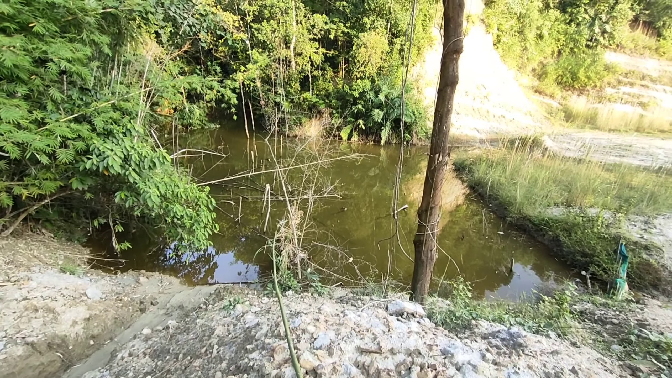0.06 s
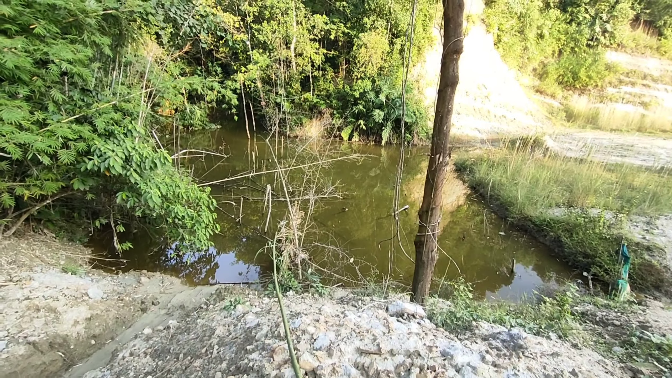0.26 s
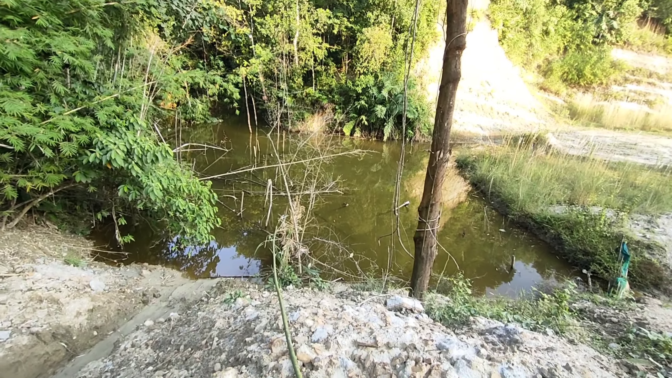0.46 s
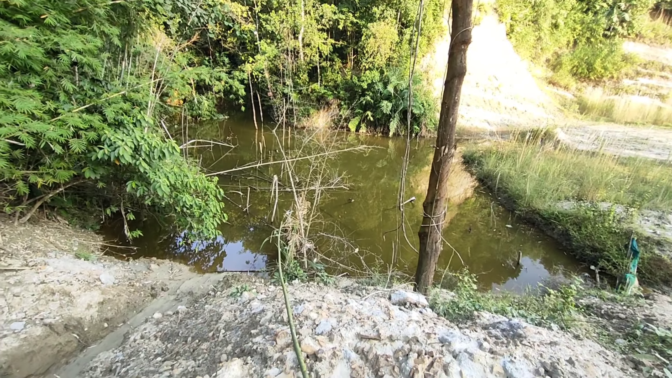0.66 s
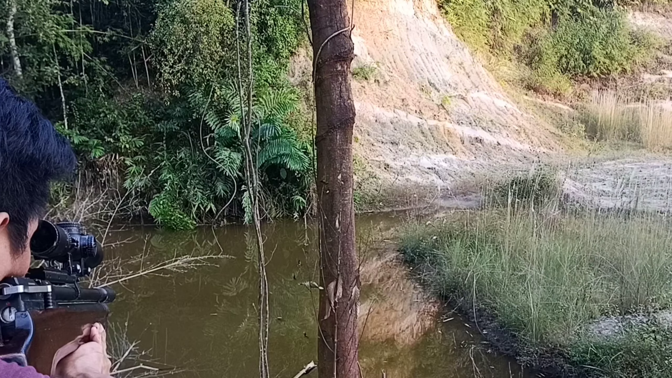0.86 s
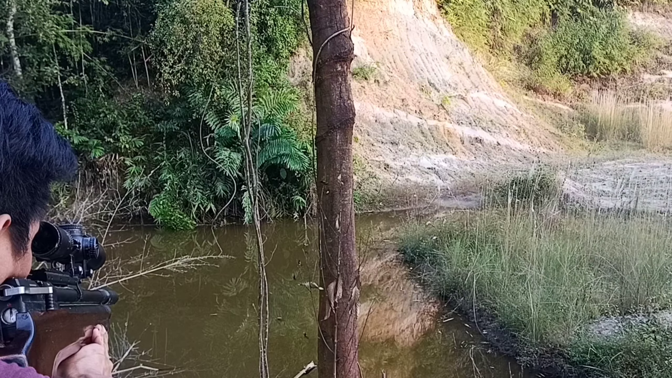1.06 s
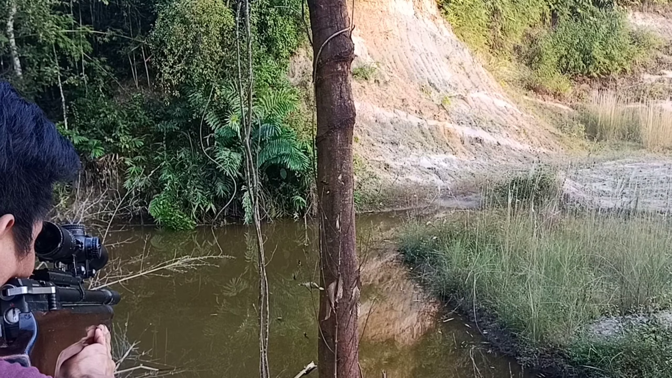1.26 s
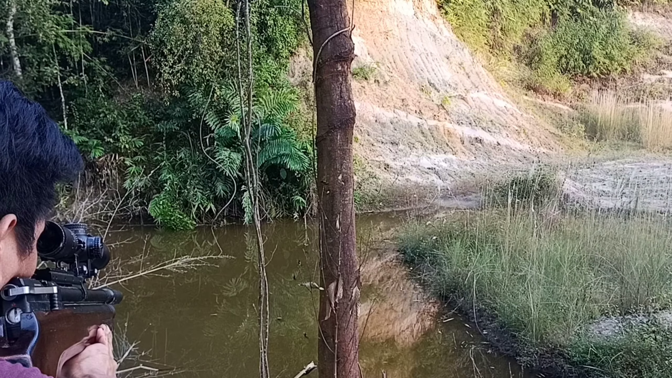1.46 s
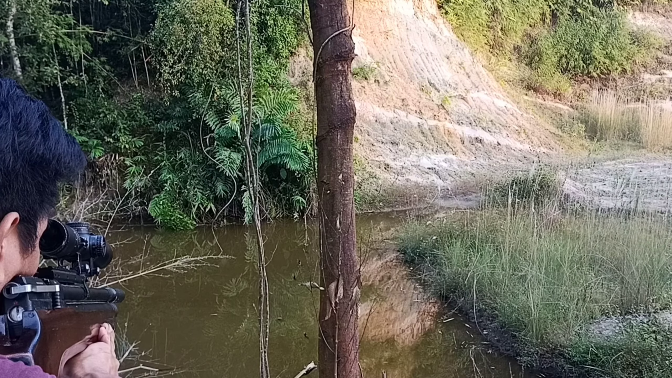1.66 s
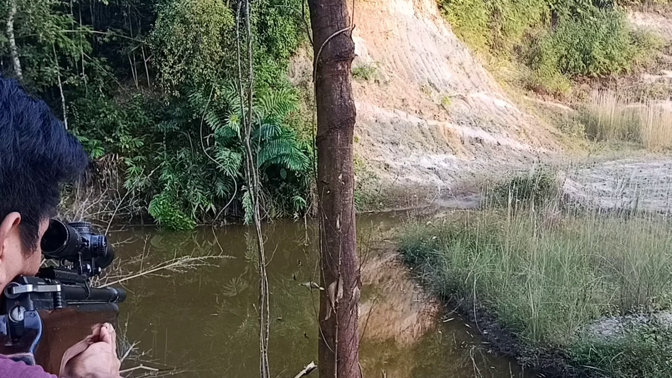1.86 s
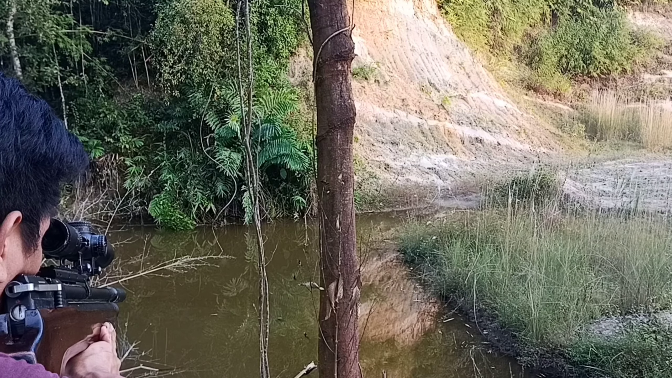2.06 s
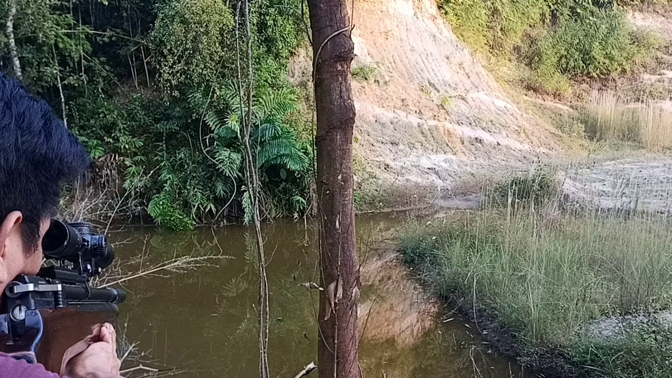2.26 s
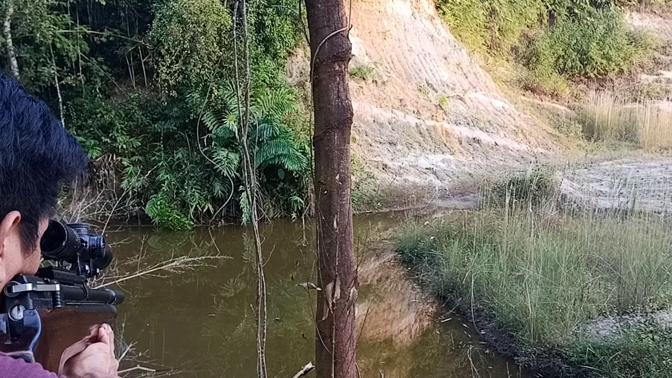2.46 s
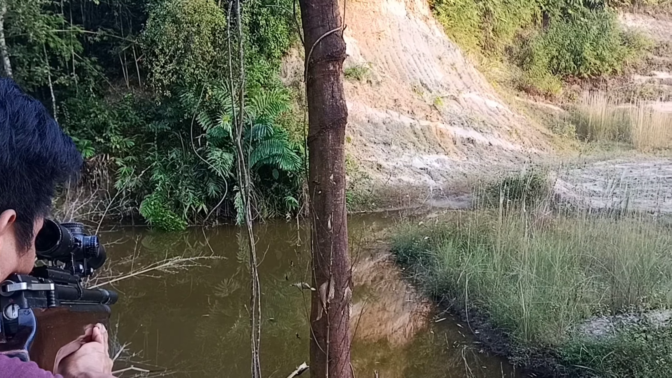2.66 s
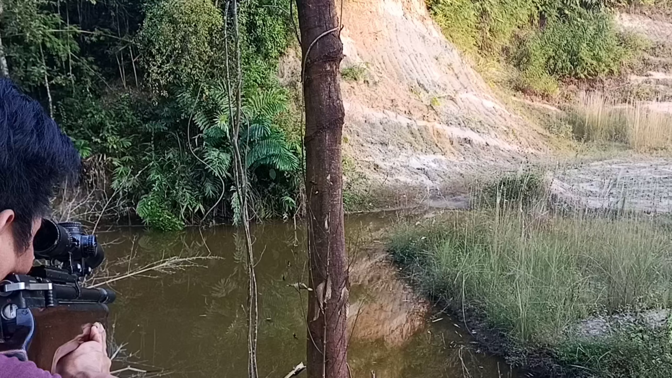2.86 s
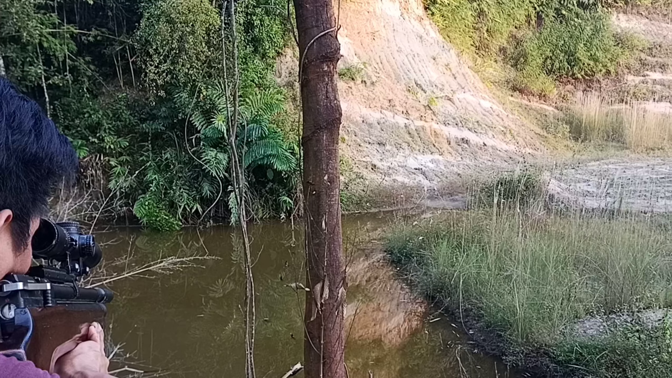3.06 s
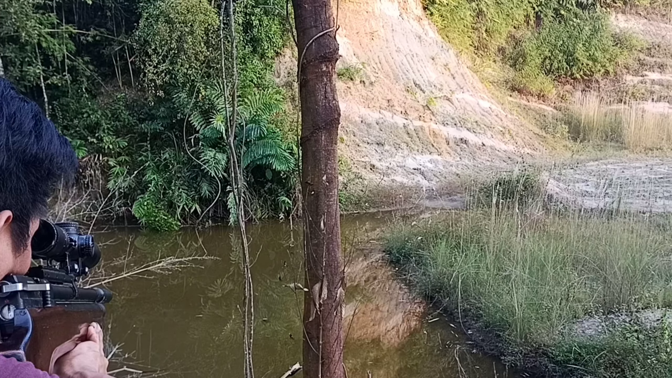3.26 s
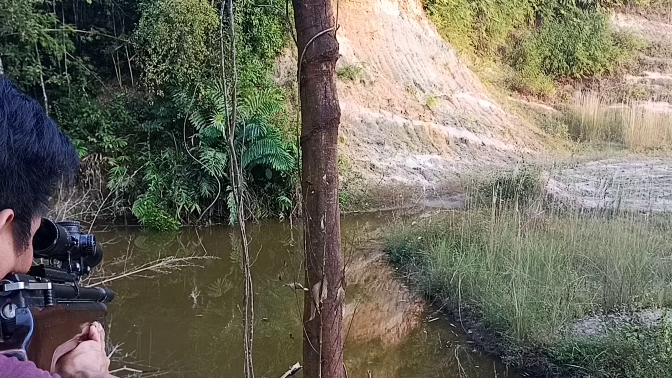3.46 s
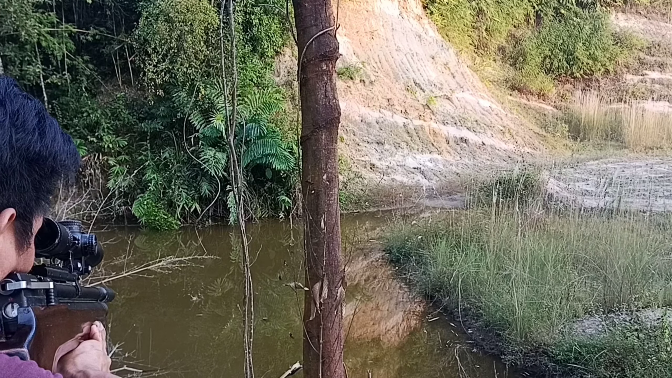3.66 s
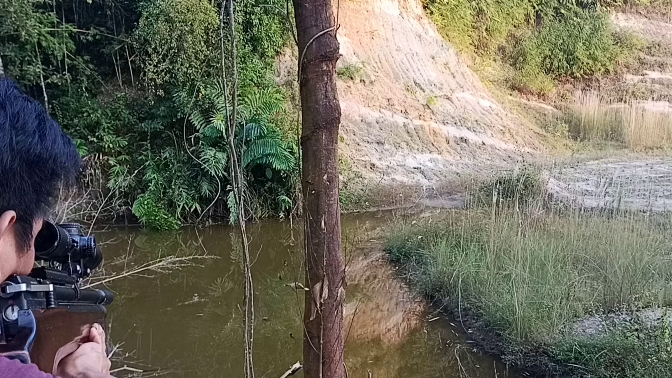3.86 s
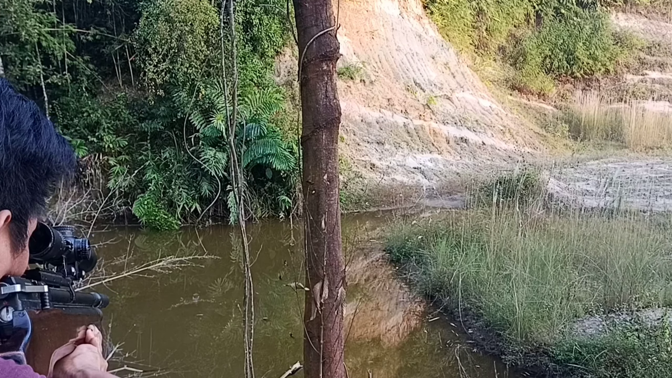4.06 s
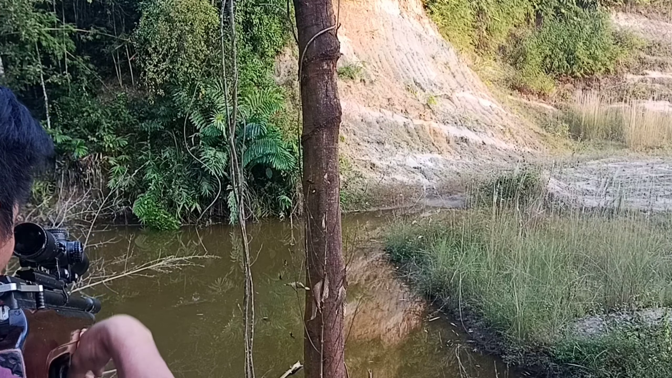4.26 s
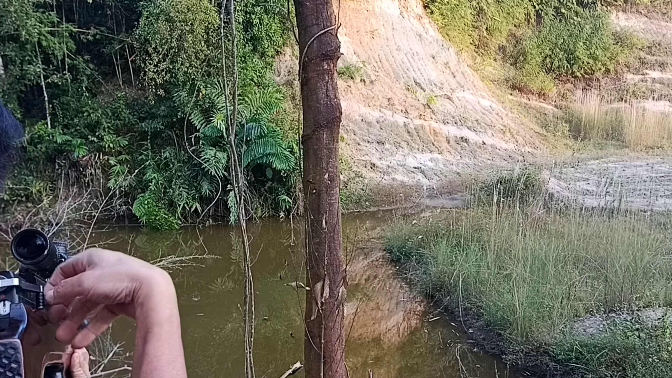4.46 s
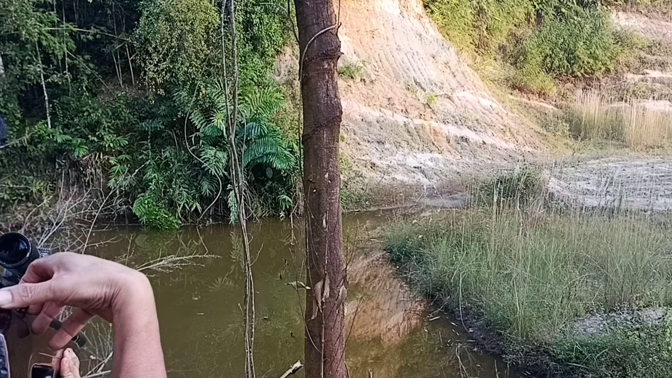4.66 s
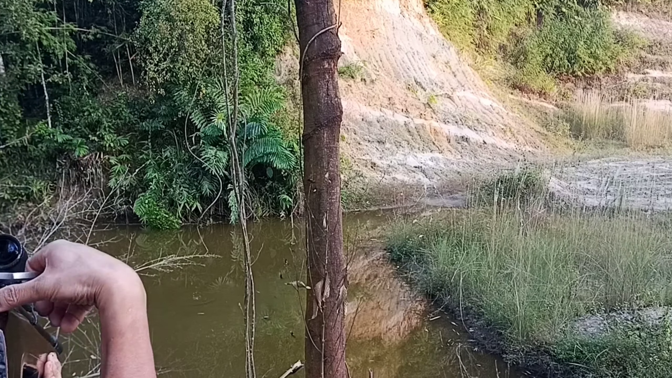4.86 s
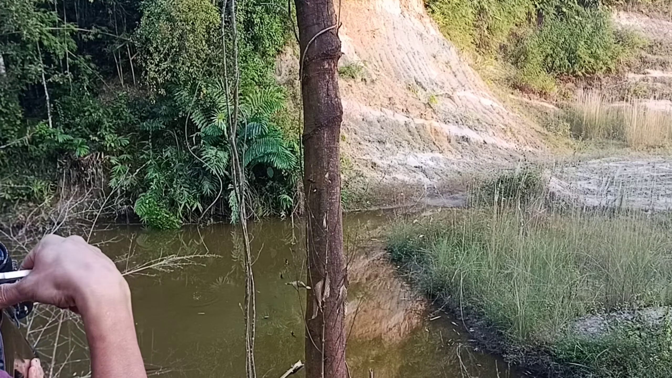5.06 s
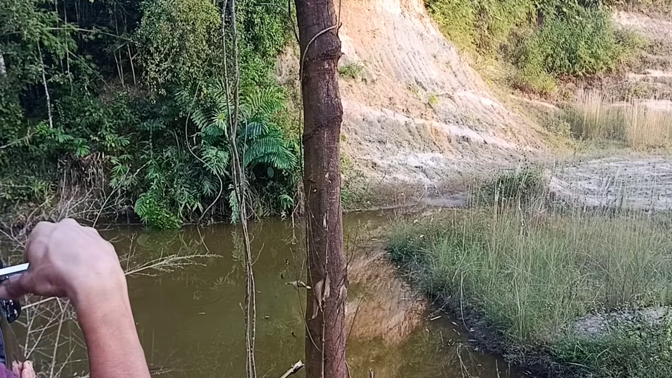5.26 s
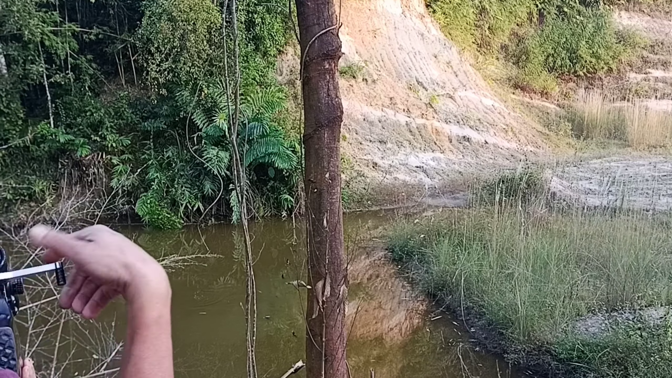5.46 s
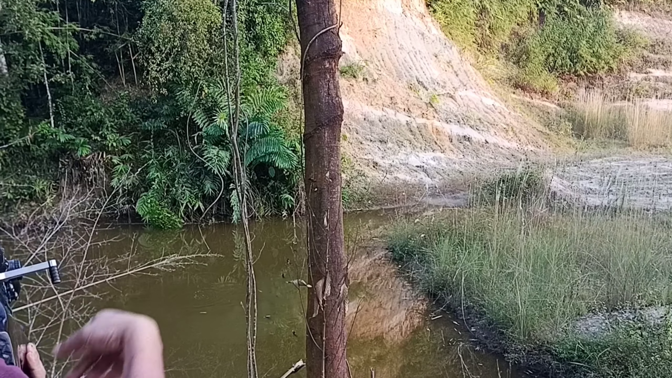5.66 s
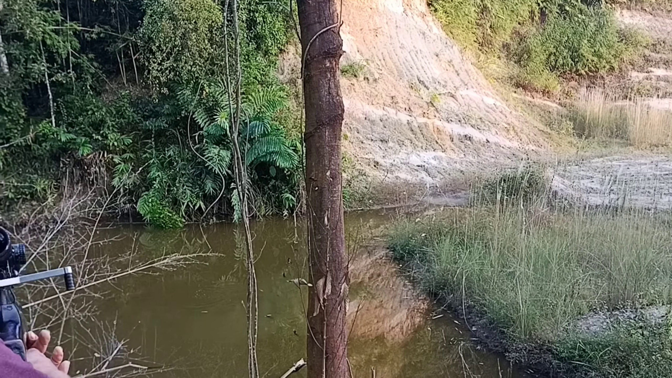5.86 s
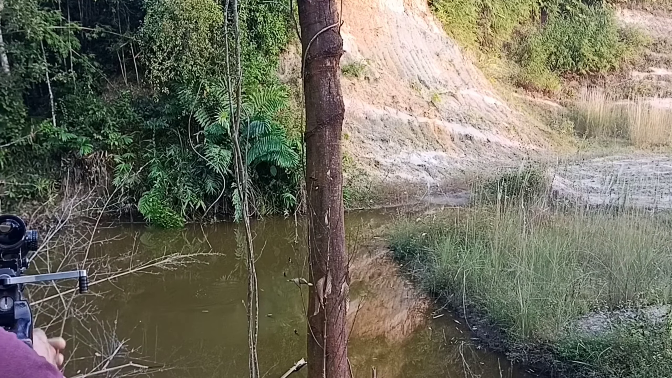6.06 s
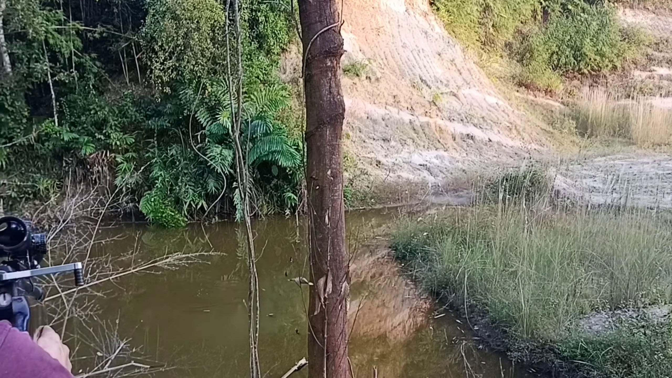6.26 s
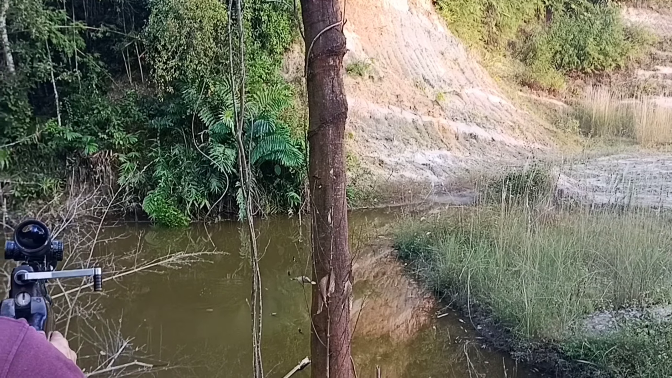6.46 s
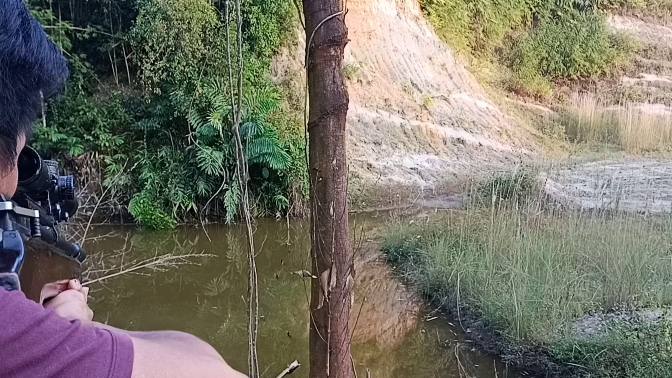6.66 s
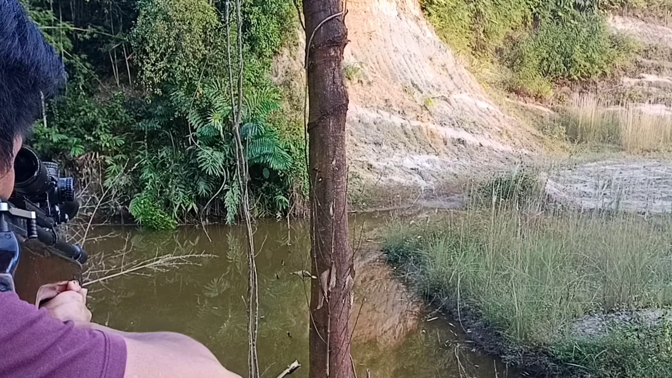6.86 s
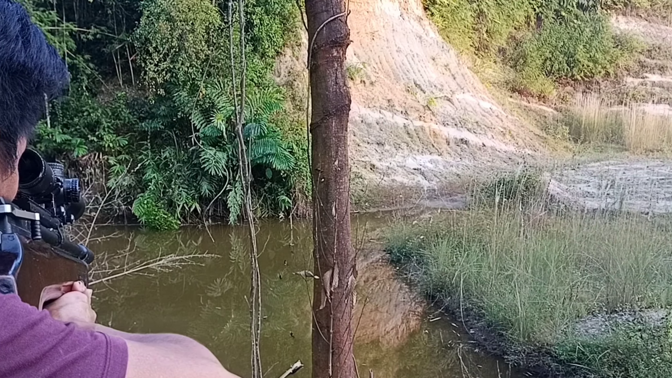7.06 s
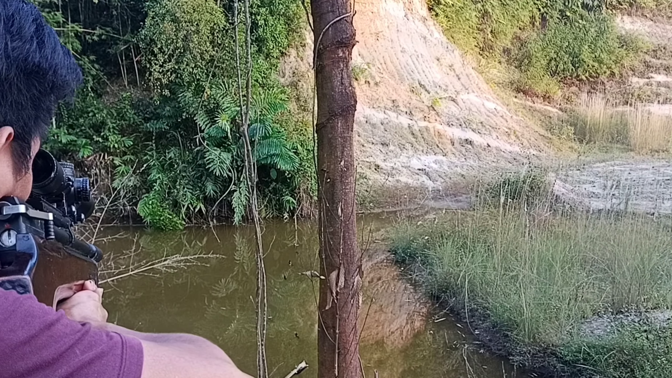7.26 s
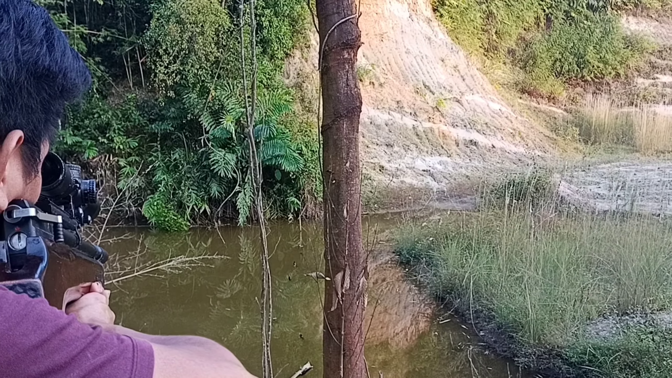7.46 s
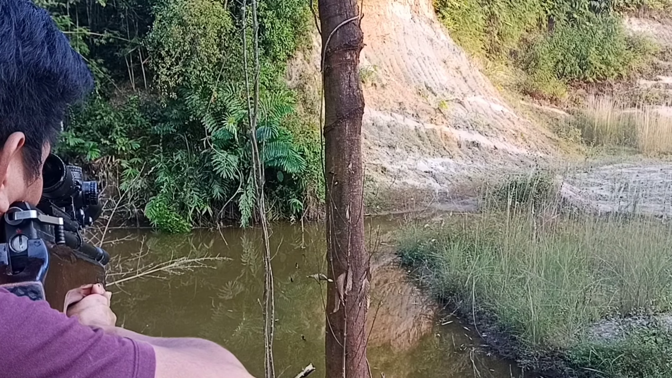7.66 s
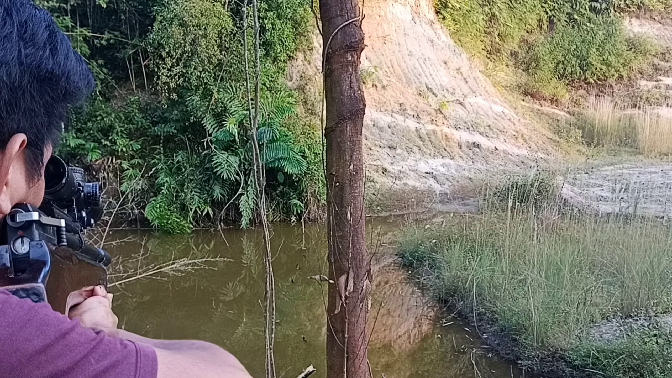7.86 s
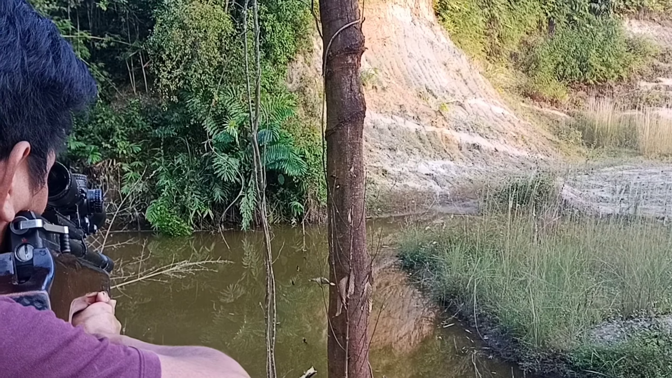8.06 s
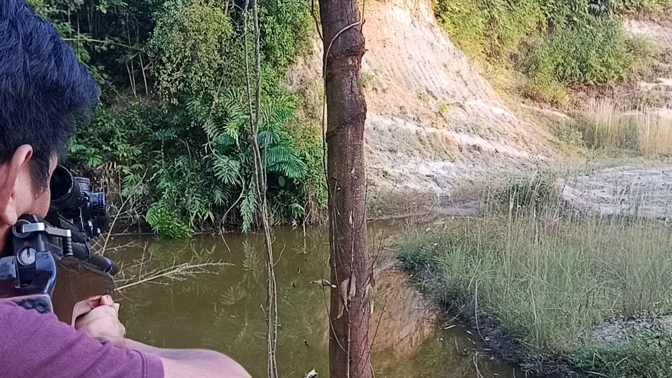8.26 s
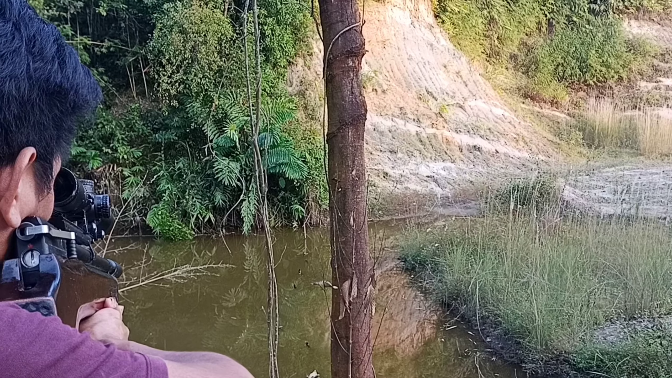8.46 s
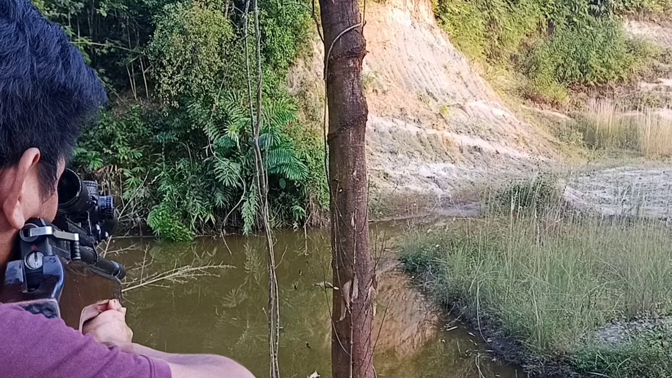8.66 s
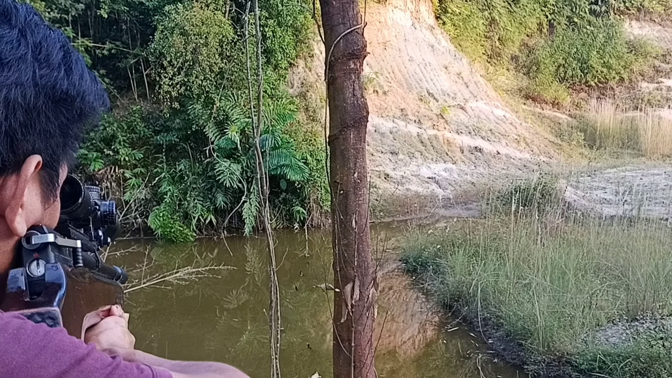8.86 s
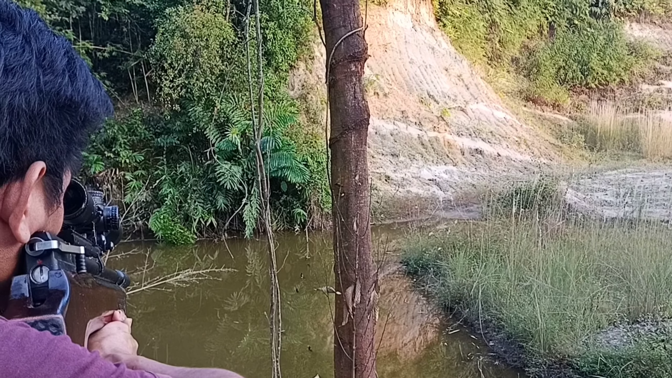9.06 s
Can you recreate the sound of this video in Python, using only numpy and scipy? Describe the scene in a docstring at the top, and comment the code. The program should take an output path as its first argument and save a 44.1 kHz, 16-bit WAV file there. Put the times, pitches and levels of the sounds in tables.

```python
"""Gravel scuffs by a pond; after a short silence, a steady insect chorus sets in, with far knocks.
At about 3.4 s an air rifle fires: its valve lets out a short blast of air, the slug smacks into
the water and a clay bank throws the noise back. The rifle is cocked with a run of metal clicks.
At about 8.3 s a second, duller shot thuds, with a few faint plops before and after it."""
import sys
import numpy as np
from scipy import signal
from scipy.fft import rfft, irfft
from scipy.io import wavfile
from scipy.ndimage import uniform_filter1d

SR = 44100
rng = np.random.default_rng(int(sys.argv[2]) if len(sys.argv) > 2 else 0)


def inscribe(sig):
    """Save sig as 16-bit PCM at rate SR to the path in sys.argv[1].

    A 1-D sig is mono; a 2-D sig holds one channel per row.
    Samples are clipped to [-1, 1] before scaling.
    """
    pcm = np.round(np.clip(np.atleast_2d(sig).T, -1, 1) * 32767)
    wavfile.write(sys.argv[1], SR, pcm.astype(np.int16))


N = 401310
TIME = np.arange(N) / SR
FREQS = np.maximum(np.fft.rfftfreq(N, 1 / SR), 1)

# A "colour" says how strong a noise is from low to high; a fade time (t60) is a drop of 60 dB.
# colours of the air blast, its echoes and the firing thump: (frequency [Hz], relative level [dB])
BLAST_COLOUR = [(880, -49), (1500, -21), (2170, -31), (2890, -14.5), (3510, -20), (3690, -12), (4350, -2),
                (4940, 0), (6070, 3), (6690, -12), (7750, 1), (11400, -5.5), (12100, -3.5), (14200, -2.5),
                (15500, -11)]
ECHO_COLOUR = [(880, -37), (1500, -6.5), (1970, -10), (2540, -8.5), (3690, -5), (4480, -2), (6070, 1),
               (7230, 4.5), (10800, -5.5), (15500, -2.5)]
THUMP_COLOUR = [(90, -13), (170, 1), (320, -10), (480, 2.5), (750, -10), (1000, -2.5), (1500, -6),
                (2500, -15)]
# ringing notes of the tube around the muzzle: (pitch [Hz], relative level [dB])
MUZZLE_NOTES = [(4458, -10.5), (4594, -21), (4784, -24), (4966, -16), (5085, -13), (5505, -14), (5676, -21),
                (5990, -23), (7569, -22), (7917, -23), (8138, -28), (9123, -29), (10093, -26), (11135, -20),
                (14227, -15), (14637, -17), (15160, -16), (15243, -8)]
# echoes from near trees, the bank and the woods: (delay [s], level [dB], rise [s], fade time [s])
ECHOES = [(.012, -32, .004, 0.27), (.042, -34.5, .008, 1.5), (0.149, -22.5, 0.013, 0.44),
          (.24, -34.5, .05, 1.05)]
SHOT_S, VALVE_OPEN_S, VALVE_RISE_S = 3.4422, .0205, .0008

# smacks and faint plops on the water:
# (time [s], crack [dB], air pocket [dB], pocket's first pitch [Hz], slap [dB], echo [dB])
SMACKS = [(3.5521, -14.5, -10.5, 130, -19, -37), (7.508, -80, -40, 302, -52, -75),
          (7.925, -80, -42, 355, -49, -64), (8.293, -47.5, -27, 222, -30, -55.5),
          (8.309, -58, -34, 710, -39, -76), (8.338, -70, -36, 307, -54, -76),
          (8.7427, -62, -35.5, 294, -43.5, -53.5)]
# colours of a smack's crack, slap and echo: (frequency [Hz], relative level [dB])
CRACK_COLOUR = [(1000, -26), (2300, -22), (3500, 4), (5000, 5), (7000, -3), (9000, 3.5), (12000, -1.5),
                (15500, -0.5)]
SLAP_COLOUR = [(50, 13), (130, 9.5), (300, -0.5), (500, 2), (800, -9), (1500, -22.5), (2500, -29),
               (5000, -39)]
BANK_COLOUR = [(50, -53), (100, -3), (155, -5), (230, -6.5), (500, -6), (1100, -15), (2000, -18.5),
               (3500, -21.5), (7000, -43)]

# faint opening ticks, the rifle's metal clicks and one last far knock at 6.59 s:
# (time [s], snap [dB], relative ring level [dB], ring pitch [Hz])
CLICKS = [(.155, -70, -54, 2100), (.542, -68, -52, 1980), (1.115, -52, -44, 2420),
          (1.334, -56, -46.5, 3200), (3.4355, -34, -28, 800), (4.211, -35.5, -47, 3000),
          (4.565, -37, -42.5, 1590), (4.8415, -25.5, -37, 1460), (4.956, -35.5, -42.5, 1910),
          (5.012, -34.5, -36, 1380), (5.245, -32, -70, 3500), (5.2522, -11, -23, 1220),
          (5.3103, -24.5, -19, 1910), (5.395, -44, -31.5, 4200), (5.411, -31.5, -31, 1380),
          (5.436, -38, -42, 1340), (5.479, -40, -41.5, 1290), (5.585, -46, -30, 3070),
          (5.626, -44, -35.5, 3350), (5.671, -44, -39, 2980), (6.248, -39, -35.5, 2530),
          (6.591, -49, -41.5, 710)]
# fingers ticking on the rifle:
# (start [s], end [s], rate [1/s], snap [dB], relative ring level [dB], ring pitch [Hz])
FINGER_TICKS = [(4.52, 5.2, 12.5, -49, -47.5, 1500), (5.329, 5.53, 22, -46, -48, 1500),
                (6.28, 6.55, 9.8, -58, -46.5, 1900)]
# ringing notes of the rifle, used for every click: (pitch [Hz], relative level [dB], fade time [s])
RING_NOTES = [(295, 7.5, 0.044), (550, 5.5, 0.031), (707, 3.5, 0.023), (827, -4.5, 0.045),
              (1050, -11, 0.068), (1175, -1, 0.044), (1448, -4.5, 0.06), (1716, 1.5, 0.015),
              (2100, -4.5, 0.037), (2470, 2.5, 0.013), (2690, -6.5, 0.036), (2960, 3, 0.019),
              (3500, 4, 0.017), (4000, 13.5, 0.01)]
# squeaks of the cocking lever: (time [s], length [s], level [dB], first pitch [Hz], last pitch [Hz])
SQUEAKS = [(5.3132, 0.0041, -20, 2940, 2100), (5.358, 0.029, -52, 2400, 1850),
           (5.383, 0.0065, -35.5, 2250, 1660)]
# the rifle bumping the shoulder: (time [s], length [s], level [dB])
BUMPS = [(6.2, 0.11, -53), (6.46, 0.175, -54.5)]
# scuffs on gravel: (time [s], level [dB])
SCUFFS = [(0, -42.5), (.016, -51), (.062, -58.5), (.082, -59)]
# colours of a snap, a bump and a scuff: (frequency [Hz], relative level [dB])
SNAP_COLOUR = [(2000, -19), (3300, -14), (4100, -1), (5500, -1), (7000, 4.5), (8600, -6.5), (11000, -5.5),
               (12700, -13), (15500, -4.5)]
BUMP_COLOUR = [(25, -12), (60, 4), (110, 4), (200, -6.5), (330, -6), (600, -21), (2000, -42)]
SCUFF_COLOUR = [(150, -19), (260, -7), (500, -10), (880, 1), (1250, -8), (1700, -4), (2500, -7),
                (3600, -13.5), (8000, -21.5), (10000, -21.5)]

# runs of chirps from the nearest cricket: (first chirp [s], last chirp [s], spacing [s])
CRICKET_RUNS = [(.873, 2.956, .04629), (3.083, 3.083, .046), (3.225, 3.406, .0452), (3.774, 3.958, .046),
                (4.082, 4.996, .0457), (5.042, 6.014, .0463), (6.059, 6.566, .0461), (6.611, 9.069, .04638)]
# runs of katydid calls: (first [s], last [s], spacing [s], length [s], level [dB], top pitch [Hz])
KATYDID_RUNS = [(1.331, 2.65, 0.3, .27, -70, 9560), (5.5, 6.36, .285, .25, -63.5, 9400),
                (6.528, 8.08, .221, 0.17, -63, 9240)]
# swells of a buzzing insect: (time [s], length [s], level [dB])
BUZZES = [(1.5, 0.27, -62.5), (2.35, .28, -56.5), (6.15, 0.51, -53.5), (7.74, 0.28, -56.5)]
# notes of a far bird: (time [s], length [s], level [dB], first pitch [Hz], last pitch [Hz])
BIRD_NOTES = [(1.68, 0.1, -69, 662, 697), (1.9, 0.11, -73, 760, 724), (2.14, 0.19, -68, 760, 696),
              (5.675, 0.094, -49, 1055, 1170)]
# steady insects: (pitch [Hz], width [Hz], level against the chorus [dB], start [s], end [s])
SINGERS = [(6220, 38, -15.5, 0.77, 6.61), (8060, 96, -15, 0.8, 4.7), (8010, 64, -11.5, .86, 9.4),
           (8400, 200, -18, .86, 9.2), (4840, 43, -22, 0.79, 9.9), (6770, 52, -11, 6.61, 12),
           (6010, 77, -17, 5.5, 5.4)]
# colours of the insect chorus at the opening, early and late: (frequency [Hz], relative level [dB])
CHORUS_OPENING = [(40, -27), (120, -7.5), (500, -10), (1200, -14), (2000, -11), (3500, -16), (4100, -13.5),
                  (4600, -1.5), (5300, -2), (6000, -16.5), (7100, -19), (8000, -7.5), (9700, -14),
                  (11000, -27), (15300, -16)]
CHORUS_EARLY = [(2000, -38), (3900, -22.5), (4400, -3.5), (5000, 1.5), (5450, -9), (5800, -17), (6300, -6),
                (6800, -4), (7200, -11), (8100, -2.5), (8900, -5.5), (9600, -16.5), (10900, -24),
                (12800, -23.5), (15200, -6)]
CHORUS_LATE = [(2000, -61), (3900, -21.5), (4400, -3), (5050, 0.5), (5700, -16), (6400, -1.5), (6800, -2.5),
               (7100, -10), (8100, -18), (8900, -8), (9600, -21), (10900, -25.5), (13500, -12),
               (15300, -10)]
# loudness of the opening chorus: (time [s], relative level [dB])
OPENING_LEVEL = [(0.0, -70), (0.02, -61), (0.214, -73.5), (0.474, -69), (0.59, -70.5)]
# colours of the far knocks and the moving air: (frequency [Hz], relative level [dB])
KNOCK_COLOUR = [(300, -15), (420, -2), (540, 3), (690, -3), (850, -6), (1000, -2.5), (1150, -2.5),
                (1350, -20), (1560, -4.5), (1800, -15)]
AIR_COLOUR = [(25, -33), (50, -6), (90, 2), (140, 0), (250, -4), (500, -6.5), (800, -12), (1300, -15.5),
              (2500, -16), (3800, -18.5), (7000, -24.5)]
# steady stretches of the background: (start [s], insects [dB], air [dB])
STRETCHES = [(0.859, -54, -63.5), (3.5, -49, -56.5), (6.61, -53.5, -59.5)]
CHORUS_CHANGE_S = 6.61
PAUSE_START_S, PAUSE_END_S, PAUSE_FADE_S = .598, .85, .008


def blast(jet_db=-14, sag_db_per_s=402, shut_db_per_s=2400, leak_s=.0081, leak_db=-31, ring_db=-2):
    """Air leaks, then jets out and rings the muzzle; it weakens as pressure sags and the valve shuts."""
    age = np.maximum(TIME - SHOT_S, 0)
    loss_db = sag_db_per_s * age + shut_db_per_s * np.maximum(age - VALVE_OPEN_S, 0)
    jet = from_db(np.maximum(jet_db - loss_db, -200)) * np.minimum(age / VALVE_RISE_S, 1)
    leak = swells([(SHOT_S - leak_s, leak_s + 2 * VALVE_RISE_S, leak_db)])
    ringing = sum(from_db(db) * np.sqrt(2) * np.sin(2 * np.pi * (hz * TIME + rng.random()))
                  for hz, db in MUZZLE_NOTES)
    return (leak + jet) * (noise(BLAST_COLOUR) + from_db(ring_db) * ringing)


def firing_thump():
    """The hammer and the pushed-out air give a low thump just ahead of the hiss."""
    return decays(times=[3.4378], dbs=[-29], t60=.09, attack=.00037) * noise(THUMP_COLOUR)


def blast_echoes(dull_from_s=3.62, dulling_s=.057, dull_hz=6500):
    """Leaves and clay throw the blast back as a crackling wash, duller the farther it has travelled."""
    bright = noise(ECHO_COLOUR)
    dull = unit_power(irfft(rfft(bright) / np.hypot(1, (FREQS / dull_hz) ** 2), N))
    brightness = np.exp(-np.maximum(TIME - dull_from_s, 0) / dulling_s)
    wash = brightness * bright + (1 - brightness) * dull
    power = sum(decays([SHOT_S + delay], [db], t60, rise) ** 2 for delay, db, rise, t60 in ECHOES)
    return np.sqrt(power) * flicker(db=1, speed_hz=250) * wash


def water_smacks(rise_per_s=9, ring_cycles=11.3, bank_delay_s=.071, bank_db=-12, woods_db=-18, low_hz=92):
    """A crack and a slap; a pocket of air rings, rising as it shrinks, and the bank answers."""
    times, crack_db, _, _, slap_db, echo_db = np.transpose(SMACKS)
    booms, age = np.zeros(N), np.arange(SR // 4) / SR
    for at, _, db, hz, _, _ in SMACKS:
        fade = from_db(db - 60 * age * hz / ring_cycles)
        boom = fade * np.cos(2 * np.pi * hz * age * (1 + rise_per_s * age))
        add(booms, at, boom * (1 - np.exp(-age / .00036)))
        add(booms, at + bank_delay_s, from_db(bank_db) * boom * (1 - np.exp(-age / .002)))
    out = booms + from_db(woods_db) * woods_echo(booms, t60=.65)
    out += decays(times, crack_db, t60=.031, attack=.0001) * noise(CRACK_COLOUR)
    out += decays(times, slap_db, t60=.077, attack=.0001) * noise(SLAP_COLOUR)
    out += decays(times + .0058, echo_db, t60=1.0, attack=.021) * noise(BANK_COLOUR)
    # so small a source gives off little deep bass
    return signal.sosfilt(signal.butter(3, low_hz, "high", fs=SR, output="sos"), out)


def pond_hollow():
    """The boom of the first smack lingers in the hollow of the pond."""
    return decays(times=[3.62], dbs=[-42], t60=.91, attack=.042) * band(hz=145, width_hz=36)


def clicks(spread=.46, ring_lag_s=.0038, ring_lift_db=2.5, stock_hz=520, stock_db=-17.5, echo_db=-17):
    """A snap, then a ring near its own pitch; in the rifle, a part springs free and then lands."""
    rows = list(CLICKS) + finger_ticks()
    times, snap_db, _, _ = np.transpose(rows)
    out = decays(times, snap_db, t60=.022, attack=.000071) * noise(SNAP_COLOUR)
    hz, note_db, t60 = np.transpose(RING_NOTES)[:, :, None]
    age = np.arange(SR // 12) / SR
    fade = from_db(-60 * age / t60) * (1 - np.exp(-age * SR / 16))
    stock = from_db(stock_db) * np.exp(-2 * np.log(hz / stock_hz) ** 2)  # adds some low ring
    for at, _, ring_db, centre_hz in rows:
        nearness = np.exp(-.5 * (np.log(hz / centre_hz) / spread) ** 2)
        weight = from_db(note_db + rng.normal(0, 2, hz.shape)) * (stock + nearness)
        pitch = hz * rng.normal(1, .014, hz.shape)
        notes = np.sin(2 * np.pi * (pitch * age + rng.random(hz.shape)))
        ring = np.sum(weight * fade * notes, axis=0) / np.linalg.norm(weight)
        add(out, at + ring_lag_s, from_db(ring_db + ring_lift_db) * ring)
    return out + from_db(echo_db) * woods_echo(out, t60=.24)


def finger_ticks(uneven_db=3):
    """Fingers tap the rifle unevenly; gives extra rows like those of CLICKS."""
    rows = []
    for start, end, rate, snap_db, ring_db, hz in FINGER_TICKS:
        chance = rng.uniform(-1, 1, size=(40, 3))
        for at, (late, hard, high) in zip(beats(start, end, 1 / rate), chance):
            force_db = uneven_db * hard
            rows.append((at + .5 * late / rate, snap_db + force_db, ring_db + force_db,
                         hz * np.exp(.5 * high)))
    return rows


def lever_squeaks():
    """The cocking lever gives short, falling squeaks."""
    return sliding_tones(SQUEAKS, rasp=.34, rasp_hz=400)


def shoulder_bumps():
    """The rifle shifts against the shoulder with soft, low bumps."""
    return swells(BUMPS) * noise(BUMP_COLOUR)


def sleeve(start_s=4.22, end_s=4.62, ticks_per_s=32, softest_db=-49, range_db=7):
    """Cloth gives tiny bright ticks at random as the hand reaches to cock the rifle."""
    when, size = rng.uniform(0, 1, size=(int((end_s - start_s) * ticks_per_s), 2)).T
    times = start_s + (end_s - start_s) * when
    ticks = decays(times, softest_db + range_db * size, t60=.017, attack=.00055)
    return ticks * band(hz=10000, width_hz=5100)


def gravel_opening(chorus_lift_db=4):
    """Gritty scuffs on gravel die away into a quiet insect chorus."""
    scuffs = decays(*np.transpose(SCUFFS), t60=.12, attack=.0018) * noise(SCUFF_COLOUR)
    scuffs *= flicker(db=2.5, speed_hz=300)
    chorus_db = chorus_lift_db + np.interp(TIME, *np.transpose(OPENING_LEVEL))
    return scuffs + from_db(chorus_db) * noise(CHORUS_OPENING) * (TIME < PAUSE_START_S + PAUSE_FADE_S)


def cricket(chirp_s=.03, edge_s=.0074, lead_s=.0105, top_hz=8090, fall_hz=1160, rasp=.12, echo_db=-12):
    """Each wing stroke slows as it closes, so the chirp falls in pitch and fades."""
    age = np.arange(0, chirp_s, 1 / SR)
    closing = (age / chirp_s) ** 2
    pitch = top_hz - fall_hz * closing
    early_db, late_db = 8 - 22 * closing, 2.5 - 9 * closing  # against the chorus
    nearest_end_s = np.minimum(age, chirp_s - age)
    shape = np.sin(np.pi / 2 * np.minimum(nearest_end_s / edge_s, 1)) ** 2
    out = np.zeros(N)
    for first, last, spacing in CRICKET_RUNS:
        db = early_db if first < CHORUS_CHANGE_S - chirp_s else late_db
        for at in beats(first, last, spacing):
            phase = 2 * np.pi * np.cumsum(pitch * rng.normal(1, .004)) / SR
            start = at - lead_s + rng.normal(0, .0008)
            add(out, start, shape * np.sin(phase) * from_db(db + rng.normal(0, .95)))
    out *= 1 + rasp * band(0, 700)
    return out + from_db(echo_db) * woods_echo(out, t60=.11)


def katydids_and_buzz(pulse_hz=68, scoop=.046):
    """Pulsing calls slide up to a pitch and hold it, blurred while far off; another insect buzzes."""
    pulses = unit_power(np.sin(np.pi * pulse_hz * TIME) ** 2 + .25)
    calls = np.zeros(N)
    for first, last, spacing, length, db, top_hz in KATYDID_RUNS:
        to_go = np.linspace(1, 0, int(length * SR))
        phase = 2 * np.pi * np.cumsum(top_hz * (1 - scoop * to_go ** 4)) / SR
        call = from_db(db) * np.sqrt(2) * np.sin(phase) * signal.windows.tukey(len(to_go), .5)
        for at in beats(first, last, spacing):
            add(calls, at, call)
    far_blur, near_blur = band(0, 800), unit_power(.5 + band(0, 260))
    buzz = swells(BUZZES) * band(hz=6200, width_hz=1900) * (.73 + .3 * pulses)
    return calls * pulses * np.where(TIME < CHORUS_CHANGE_S, far_blur, near_blur) + buzz


def bird():
    """A far bird sings a few low, rough notes."""
    return sliding_tones(BIRD_NOTES, rasp=.63, rasp_hz=90)


def chorus():
    """Countless far insects merge into a high hiss, with a few steady singers standing out."""
    out = np.where(TIME < CHORUS_CHANGE_S, noise(CHORUS_EARLY), noise(CHORUS_LATE))
    for hz, width_hz, db, start, end in SINGERS:
        out += from_db(db) * band(hz, width_hz) * (TIME > start) * (TIME < end)
    return out * flicker(db=.5, speed_hz=90)


def far_knocks(above_air_db=6.5):
    """Something knocks steadily far away, each blow drawn out by the woods."""
    times = beats(first=2.384, last=6.17, spacing=.421)
    blows = decays(times, np.full(len(times), above_air_db), t60=.65, attack=.0069)
    return blows * noise(KNOCK_COLOUR) * flicker(db=2, speed_hz=70)


def background():
    """The insects, wavering a little, over moving air and the far knocks; the level steps up after the shot and
    drops back at 6.61 s."""
    starts, insect_db, air_db = np.transpose(STRETCHES)
    insects = (chorus() + cricket()) * flicker(db=.92, speed_hz=1.16)
    air = noise(AIR_COLOUR) + far_knocks()
    return background_gain(starts, insect_db) * insects + background_gain(starts, air_db) * air


def background_gain(starts, dbs, fade_in_s=.26, dip_s=3.414, dip_length_s=.03, dip_db=-7.5):
    """The level fades in, holds steady in each stretch and dips briefly just before the shot."""
    db = dbs[np.maximum(np.searchsorted(starts, TIME) - 1, 0)]
    db = db + dip_db * (TIME > dip_s) * (TIME < dip_s + dip_length_s)
    fade = np.clip((TIME - starts[0]) / fade_in_s, 0, 1)
    return fade * from_db(uniform_filter1d(db, size=300))


def woods_echo(sound, t60):
    """Leaves and trunks scatter a sound into a smooth tail, about as strong as the sound itself."""
    age = np.arange(int(t60 * SR)) / SR
    tail = rng.standard_normal(len(age)) * from_db(-60 * age / t60)
    return signal.fftconvolve(sound, tail / np.linalg.norm(tail))[:N]


def sliding_tones(rows, rasp, rasp_hz):
    """Short rough tones that slide in pitch."""
    out = np.zeros(N)
    for at, length, db, from_hz, to_hz in rows:
        pitch = np.linspace(from_hz, to_hz, int(length * SR))
        add(out, at, from_db(db) * np.sin(2 * np.pi * np.cumsum(pitch) / SR) * np.hanning(len(pitch)))
    return out * (1 + rasp * band(0, rasp_hz))


def noise(colour):
    """Noise of power 1 with the given colour, falling away steeply past its ends."""
    hz, db = np.transpose(colour)
    ends = (np.minimum(FREQS / hz[0], 1) * np.minimum(hz[-1] / FREQS, 1)) ** 4
    gain = from_db(np.interp(np.log(FREQS), np.log(hz), db))
    return unit_power(irfft(rfft(rng.standard_normal(N)) * ends * gain, N))


def band(hz, width_hz):
    """Noise of power 1 around one frequency; around 0 Hz it is a random wobble."""
    bell = np.exp(-2 * ((FREQS - hz) / width_hz) ** 2)
    return unit_power(irfft(rfft(rng.standard_normal(N)) * bell, N))


def flicker(db, speed_hz):
    """A gain that wobbles at random by about this many decibels."""
    return from_db(db * band(0, speed_hz))


def decays(times, dbs, t60, attack):
    """Loudness curve of blows that rise quickly and die away."""
    out = np.zeros(N)
    age = np.arange(int(2 * t60 * SR)) / SR
    shape = from_db(-60 * age / t60) * (1 - np.exp(-age / attack))
    for at, db in zip(times, dbs):
        add(out, at, from_db(db) * shape)
    return out


def swells(rows):
    """Loudness curve of sounds that rise, hold and fall smoothly."""
    out = np.zeros(N)
    for at, length, db in rows:
        add(out, at, from_db(db) * signal.windows.tukey(int(length * SR), .5))
    return out


def beats(first, last, spacing):
    """Evenly spaced times."""
    return np.arange(first, last + spacing / 2, spacing)


def add(out, at_s, sound):
    """Mix a sound in at a time."""
    start = min(max(round(at_s * SR), 0), N)
    out[start:start + len(sound)] += sound[:N - start]


def from_db(db):
    """Decibels to gain."""
    return 10 ** (np.asarray(db) / 20)


def unit_power(x):
    """Scale to an average power of 1."""
    return x / np.sqrt(np.mean(x ** 2) + 1e-20)


def scene(width_db=-5):
    """All sources sit in the middle; only the opening spreads to left and right."""
    middle = gravel_opening() + background() + katydids_and_buzz()
    middle += firing_thump() + blast() + blast_echoes() + water_smacks() + pond_hollow()
    middle += clicks() + sleeve() + bird() + lever_squeaks() + shoulder_bumps()
    side = from_db(width_db) * gravel_opening()
    return np.array([middle + side, middle - side])


def record(dry, cutoff_hz=15600):
    """A short silence follows the opening, and the highest treble is cut."""
    corners = [PAUSE_START_S, PAUSE_START_S + PAUSE_FADE_S, PAUSE_END_S, PAUSE_END_S + PAUSE_FADE_S]
    gate = np.interp(TIME, corners, [1, 0, 0, 1])
    treble_cut = signal.ellip(12, .2, 80, cutoff_hz, fs=SR, output="sos")
    return signal.sosfilt(treble_cut, dry * gate + 1e-18)


dry = scene()
out = record(dry)
inscribe(out)
```